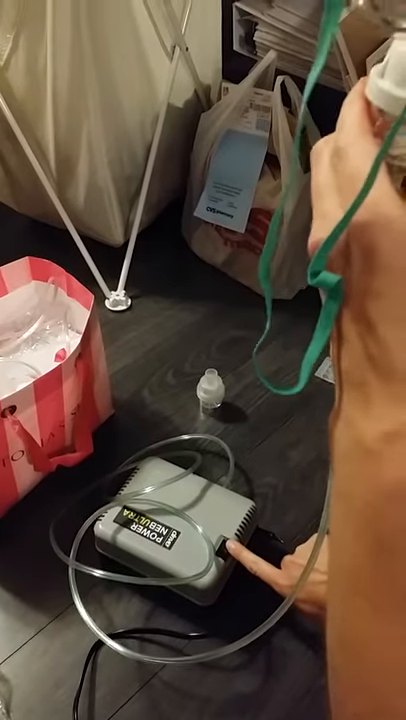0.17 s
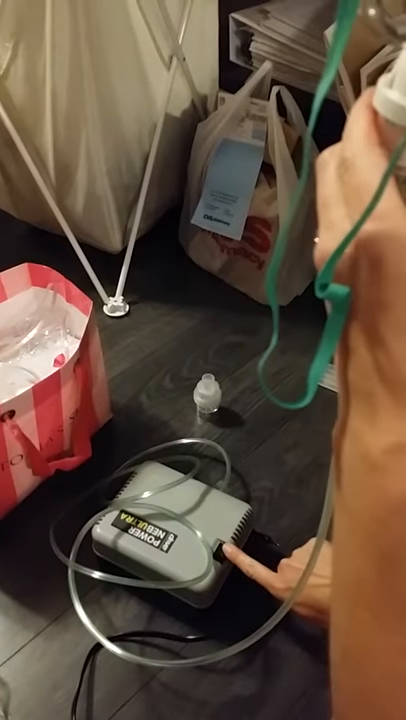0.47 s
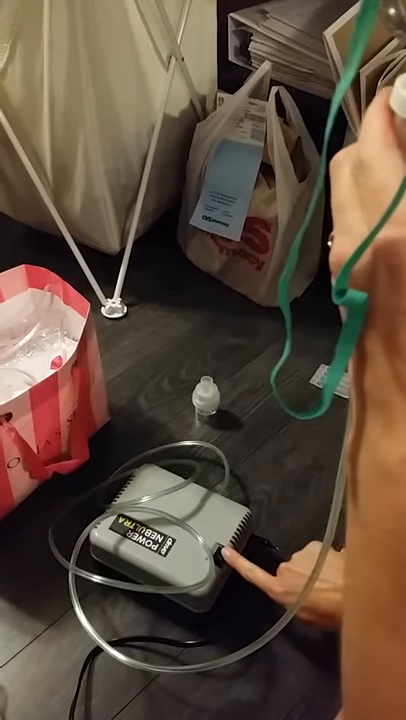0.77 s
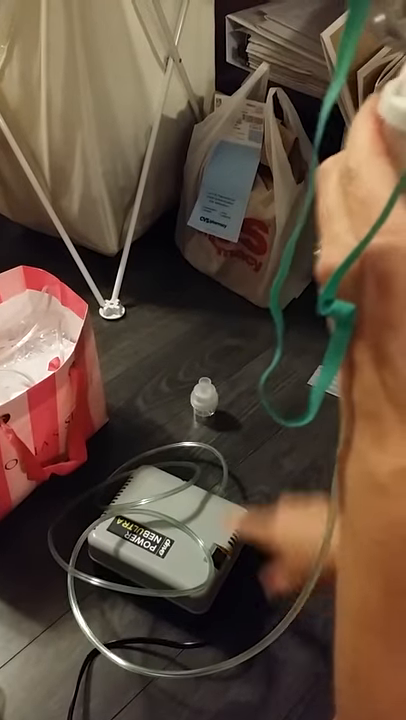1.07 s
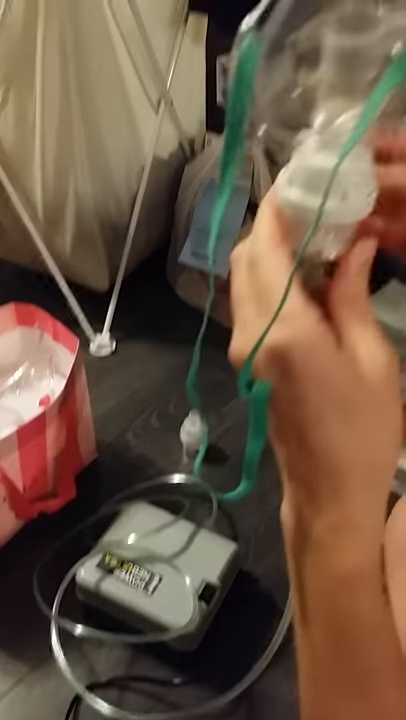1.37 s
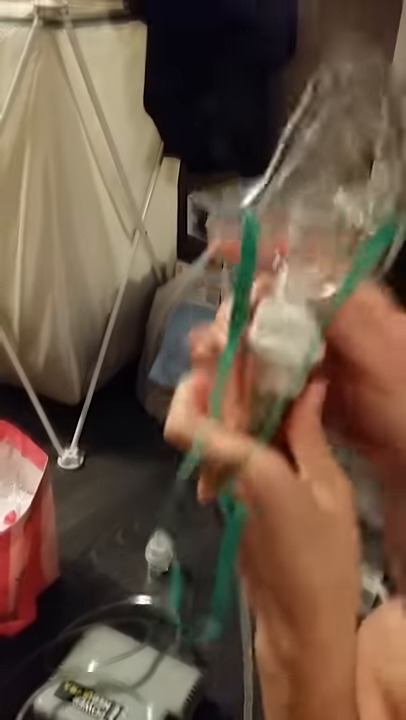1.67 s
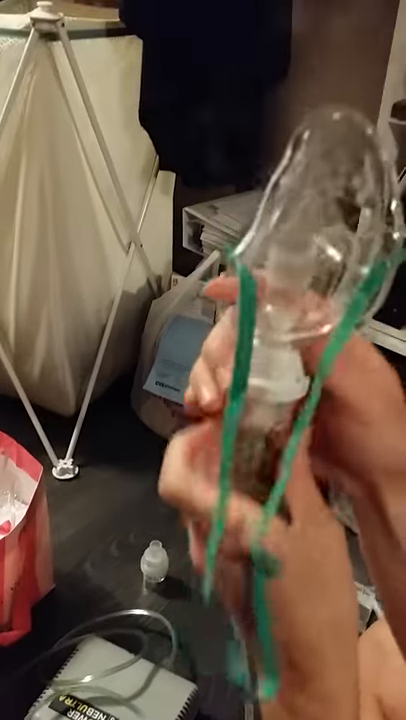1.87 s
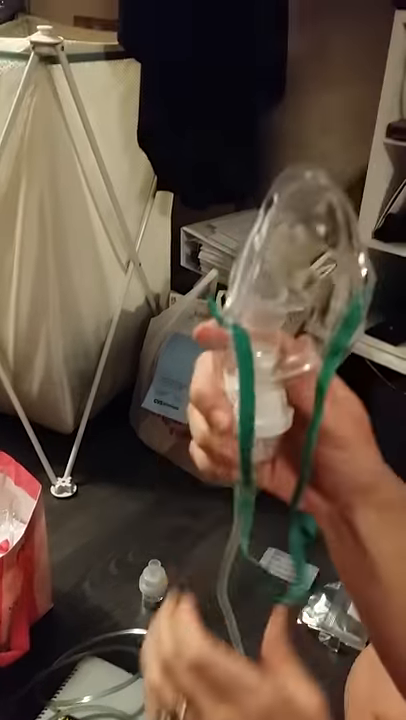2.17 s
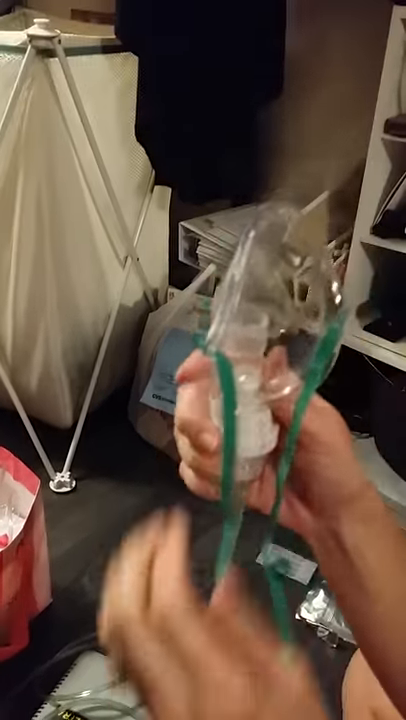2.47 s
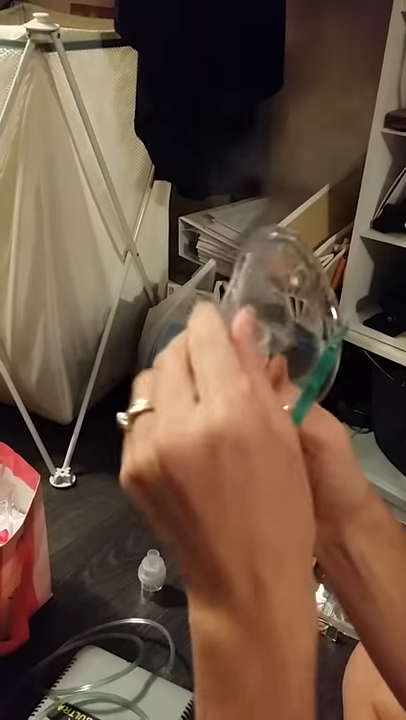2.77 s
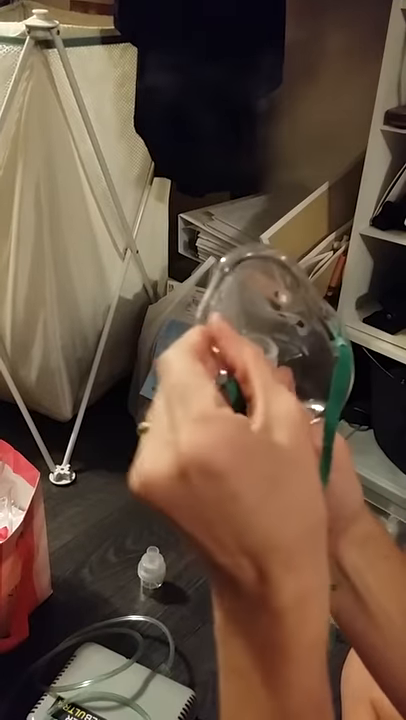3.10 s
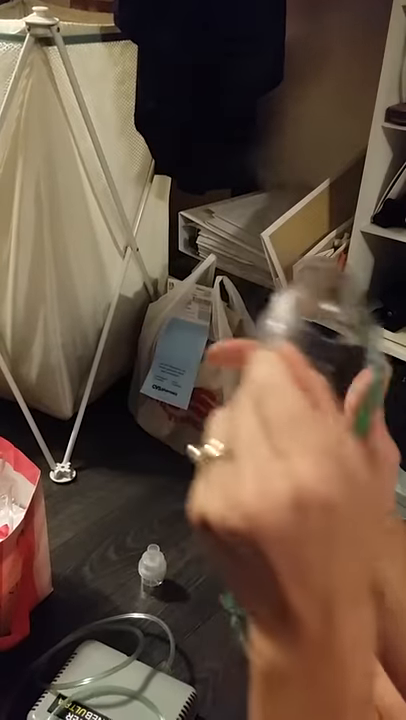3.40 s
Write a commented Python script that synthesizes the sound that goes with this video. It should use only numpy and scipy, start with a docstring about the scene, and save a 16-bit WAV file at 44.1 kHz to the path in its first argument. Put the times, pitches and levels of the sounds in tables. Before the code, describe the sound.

A nebulizer clicks on and runs with a motor buzz and growing airy hiss.

```python
"""A nebulizer starting up

On the floor of a small room a switch snaps and a piston compressor spins up to a steady buzz, whose tone
changes as the finger leaves the case. Air builds up in the hose and the jet hisses and sputters through
the resonances of the cup and mask, which a hand lifts and turns close to the microphone."""
import sys
import numpy as np
from scipy import signal
from scipy.fft import rfft, irfft, next_fast_len
from scipy.io import wavfile
from scipy.ndimage import uniform_filter1d, map_coordinates

SR = 44100
rng = np.random.default_rng(int(sys.argv[2]) if len(sys.argv) > 2 else 0)


def unload_audio(sound):
    """Save the sound as a 16-bit wav file, at the path given as the first command line argument."""
    columns = np.transpose(np.atleast_2d(sound))
    # keep every value between -1 and 1, then stretch to whole-number steps
    steps = np.round(np.clip(columns, -1, 1) * 32767)
    wavfile.write(sys.argv[1], SR, steps.astype(np.int16))


N = 156114
TIME_S = np.arange(N) / SR


def amp(db):
    """Amplitude ratio of a level in decibels."""
    return 10 ** (np.asarray(db) / 20)


def along(points, hz):
    """Interpolation on a logarithmic frequency axis."""
    knots_hz, values = np.transpose(points)
    return np.interp(np.log(hz + 1), np.log(knots_hz + 1), values)


def colour(points):
    """Spectral envelope: gain as a function of frequency."""
    return lambda hz: amp(along(points, hz))


def curves(rows):
    """Linear interpolation in time of each column after the first."""
    times, *columns = np.transpose(rows)
    return [np.interp(TIME_S, times, column) for column in columns]


def crossfade(middle_s, length_s):
    """Linear transition from 0 to 1."""
    return np.clip((TIME_S - middle_s) / length_s + .5, 0, 1)


def wobble(knots_per_s):
    """Smooth random modulation."""
    return map_coordinates(rng.standard_normal(N // 16), [TIME_S * knots_per_s], mode="wrap")


def panned(pan_db):
    """Constant-power panning; pan_db is the left level minus the right."""
    gains = amp(np.array([pan_db, -pan_db]) / 2)
    return gains / np.sqrt(np.mean(gains ** 2, axis=0))


# Likeness of left and right: frequency_hz, coherence
COHERENCE = [(50, 0.35), (600, 1), (1200, 0.18), (2200, 0.074), (4600, 0.34), (14000, 0.76)]
def noise(gain, lead_rad=0):
    """Partially coherent stereo noise, slightly patchy, of unit mid rms; the left leads by lead_rad."""
    cells = signal.stft(rng.standard_normal((2, N)), nperseg=512)[2]
    patches = uniform_filter1d(rng.standard_normal(cells.shape[1:]), size=6, axis=0)
    patches = uniform_filter1d(patches, size=14, axis=1)
    patches_db = 2.39 * patches / np.sqrt(np.mean(patches ** 2))
    white = signal.istft(cells * amp(patches_db), nperseg=512)[1][:, :N]
    size = next_fast_len(N)
    hz = np.fft.rfftfreq(size, 1 / SR)
    spread = np.arccos(along(COHERENCE, hz)) / 2
    mid, side = rfft(white, size) * gain(hz) * np.array([np.cos(spread), np.sin(spread)])
    phase_shift = np.exp(.5j * lead_rad * np.array([[1], [-1]]))
    pair = irfft(np.array([mid + side, mid - side]) * phase_shift, size)[:, :N]
    return pair / pair.mean(0).std()


def resonance(strength, centres, half_width_hz, lead_rad=0):
    """Noise-driven resonance: a Lorentzian band whose level, pan and centre move."""
    level_db, pan_db = curves(strength)
    centre_hz, = curves(centres)
    mean_hz = centre_hz.mean()
    band = noise(lambda hz: 1 / (1 + ((hz - mean_hz) / half_width_hz) ** 2), lead_rad)
    analytic = signal.hilbert(band, next_fast_len(N))[:, :N]
    drift = np.exp(2j * np.pi * np.cumsum(centre_hz - mean_hz) / SR)
    return amp(level_db) * panned(pan_db) * np.real(analytic * drift)


# Spectrum of the quiet room: frequency_hz, density_db
ROOM_SPECTRUM = [(30, -2), (200, 16), (1000, -17), (14000, -48)]
def room_tone():
    """Ambient noise: a steady floor with most of its power at low frequencies."""
    return amp(-62) * noise(colour(ROOM_SPECTRUM))


# Bumps of the hands on hose and cup: peak_s, level_db
BUMPS = [(1.79, -57), (1.87, -58), (2.05, -65), (2.33, -62), (2.48, -59.5), (3.51, -58)]
# Their spectrum: frequency_hz, density_db
BUMP_SPECTRUM = [(20, -8), (45, -1), (90, 9), (200, -26), (800, -60)]
def handling(half_width_s=0.028):
    """Soft impacts: the slow contact of a shifting grip excites mainly low frequencies."""
    envelope = sum(amp(db) * np.exp(-((TIME_S - peak_s) / half_width_s) ** 2) for peak_s, db in BUMPS)
    return envelope * noise(colour(BUMP_SPECTRUM))


# Snap of the rocker switch: frequency_hz, density_db
SWITCH_SPECTRUM = [(60, -50), (260, 7), (420, -30), (650, 3.5), (1400, -14), (2200, 0), (5000, -4),
                   (7300, 2), (8500, 10), (10500, -4), (14500, -12)]
def switch(t60_s=0.21):
    """Reverberant decay: the snap dies away exponentially in the room."""
    envelope = amp(-33 - 60 * TIME_S / t60_s)
    return envelope * noise(colour(SWITCH_SPECTRUM), lead_rad=1.0) * panned(-2.0)[:, None]


# Strength of the case's groan: time_s, level_db, pan_db
GROAN = [(.03, -73, 3), (.08, -57, 4), (.13, -41.5, 0), (.17, -58, 2), (.23, -42, 7), (.3, -65, 11),
         (.4, -90, 0)]
# Its pitch: time_s, centre_hz
GROAN_CENTRE = [(.08, 590), (0.158, 622), (0.209, 519.5)]
def case_groan():
    """Structural resonance: the case groans under the starting torque."""
    return resonance(GROAN, GROAN_CENTRE, half_width_hz=18)


# Shaft speed as the motor spins up: time_s, speed_hz
SHAFT_SPEED = [(0, 14), (.08, 30), (.15, 43), (.2, 51), (.26, 54), (.32, 54.27), (1, 54.2), (1.28, 54.27),
               (3.54, 54.28)]
def shaft():
    """Rotation: speed in Hz and its integral, the angle in radians; one turn is one piston stroke."""
    speed_hz, = curves(SHAFT_SPEED)
    return speed_hz, 2 * np.pi * np.cumsum(speed_hz) / SR


# Response of the case under the finger: multiple_of_running_speed, gain_db
CASE_PRESSED = [(1, -7), (2, -4), (3, -21), (4, 4), (5, -1), (6, -7), (7, -14), (8, -30), (9, -0.5),
                (10, -5.5), (11, 1.5), (12, 1), (13, 6.5), (14, -2.5), (15, -34), (16, -7), (17, -11),
                (18, -1.5), (19, 1.5), (20, -2.5), (21, -7), (22, -7), (23, -7.5), (24, -19), (25, -16),
                (26, -25), (27, -11), (28, -9.5), (29, -34), (30, -11.5), (35, -14.5), (36, -33)]
# Response of the free case: multiple_of_running_speed, gain_db
CASE_FREE = [(1, -45), (2, -16.5), (3, -19.5), (4, -7.5), (5, -11.5), (6, -14.5), (7, -17.5), (8, -26.5),
             (9, -12.5), (10, -10.5), (11, -1.5), (12, 3.5), (13, -9.5), (14, -7.5), (15, -20.5),
             (16, -8.5), (17, -14.5), (18, -9.5), (19, -12), (20, -8.5), (21, -14), (22, -13.5),
             (23, -14.5), (24, -21.5), (25, -21.5), (26, -23), (27, -18.5), (28, -13.5), (29, -23),
             (30, -36), (31, -21.5), (32, -31), (33, -14.5), (34, -22.5), (35, -21.5), (36, -17.5),
             (37, -40), (38, -24.5), (39, -25.5), (40, -26.5), (41, -24), (42, -25.5), (43, -38), (45, -38),
             (46, -27), (47, -22.5), (48, -40), (49, -19), (50, -18.5), (51, -20), (52, -28)]
def case_buzz(speed_hz, angle, released, running_hz=54.27, chug_order=11.5):
    """Forced vibration: shaft harmonics sweep up through the case's resonances, held near unit rms."""
    buzz = np.zeros((2, N))
    for order, (smear, skew) in enumerate(rng.standard_normal((len(CASE_FREE), 2)), 1):
        multiple = order * speed_hz / running_hz
        pressed_db = np.interp(multiple, *np.transpose(CASE_PRESSED), right=-26)
        free_db = np.interp(multiple, *np.transpose(CASE_FREE))
        gain = amp(pressed_db + released * (free_db - pressed_db))
        # Orders near the main resonance stay in step and chug; the room smears the others' phases.
        distance = abs(order - chug_order)
        smear_rad = .3 * smear * max(distance - 2, 0)
        dispersion_rad = .13 * distance ** 2
        stereo_rad = np.array([[.5], [-.5]]) * min(0.11 * order, 1.5) * (.5 * skew - 1)
        buzz += gain * np.cos(order * angle + smear_rad - dispersion_rad + stereo_rad)
    power = uniform_filter1d(np.mean(buzz ** 2, axis=0), size=SR // 9)
    return buzz / np.sqrt(np.abs(power) + 1e-9)


# Loudness of the compressor: time_s, relative_level_db
COMPRESSOR_LEVEL = [(.03, -60), (.12, -50.5), (.23, -41), (.45, -44), (.75, -44.5), (.95, -39.5),
                    (1.3, -35), (1.55, -34.5), (1.85, -32), (2.1, -34), (3, -32.5), (3.3, -31),
                    (3.54, -28.5)]
# Air churning in the pump: frequency_hz, density_db
CHURN_SPECTRUM = [(25, -53), (55, -32), (90, -11), (180, -10), (300, -8.5), (410, -16), (520, -7),
                  (650, 0.5), (800, -6), (1100, -8), (1500, -13.5), (2000, -15), (3200, -21), (8000, -39)]
def compressor(speed_hz, angle):
    """Periodic excitation: every piston stroke thumps the case and churns the air in the pump."""
    level_db, = curves(COMPRESSOR_LEVEL)
    released = crossfade(middle_s=1.25, length_s=0.35)
    churn_db = -8 - 2.5 * released  # stronger until the finger leaves the case
    churn = amp(churn_db) * noise(colour(CHURN_SPECTRUM)) * (1 + 0.55 * np.cos(angle))
    scatter_db = .45 * wobble(50)
    buzz = amp(0.57) * case_buzz(speed_hz, angle, released)
    return amp(level_db + scatter_db) * (buzz + churn)


# The jet's hiss in three bands: time_s, relative_level_db, pan_db
HISS_LOW = [(0.06, -64, -2.0), (0.11, -71, -19), (0.29, -51.5, 1), (0.67, -53.5, 2.5), (1.27, -41.5, -0.5),
            (2.07, -45.5, -1.5), (2.92, -44.5, -9), (3.51, -41, -1)]
HISS_MID = [(0.06, -65.5, 4.5), (0.29, -49, 11), (.7, -50, 9.9), (1.13, -44.5, 10), (1.23, -39, 15),
            (1.49, -45, 8.8), (2.1, -42.5, 2.6), (3.46, -44, 5.8)]
HISS_TOP = [(0.06, -69, -3), (0.08, -58, 5.0), (0.19, -44, 5), (0.5, -38, 6.5), (0.82, -36.5, 6.5),
            (1.12, -31, 6.5), (1.29, -30, 8), (1.34, -30.5, 4), (1.54, -32.5, 6), (1.77, -30.5, 4),
            (1.86, -35, 1), (2.09, -34.5, 2), (2.3, -34.5, 2.5), (2.6, -32.5, 1), (3.02, -31.5, 5.5),
            (3.52, -29, -3.5)]
# Spectra of those bands: frequency_hz, density_db
LOW_SPECTRUM = [(200, -16.5), (900, -0.5), (1300, 1), (1800, -3), (2300, 8), (2850, 5), (3100, -13),
                (3400, -38), (3800, 5.5), (4500, -57)]
MID_SPECTRUM = [(3000, -100), (3600, -10.5), (4200, -6), (4620, 2), (5000, 0.5), (5550, 2.5), (5850, -7.5),
                (6200, -60), (7000, -52)]
TOP_SPECTRUM = [(5800, -91), (6500, -22), (7100, -2), (7700, -7.5), (8400, 1.5), (9000, -1), (10300, -2.5),
                (11200, -5), (12100, 4.5), (13200, 3), (14400, 4), (16000, -5)]
JET_LEAD_RAD = 1.78
def jet_hiss():
    """Turbulence: broadband noise from the jet grows as air builds up in the hose."""
    hiss = np.zeros((2, N))
    for strength, spectrum, gain_db, lead_rad in ((HISS_LOW, LOW_SPECTRUM, -3, 0),
                                                  (HISS_MID, MID_SPECTRUM, 1, -JET_LEAD_RAD),
                                                  (HISS_TOP, TOP_SPECTRUM, 1, JET_LEAD_RAD)):
        level_db, pan_db = curves(strength)
        hiss += amp(level_db + gain_db) * panned(pan_db) * noise(colour(spectrum), lead_rad)
    return hiss


# Strength of the vent's resonance: time_s, level_db, pan_db
VENT = [(.7, -56, 7), (1.05, -35, 18), (1.3, -31, 9), (1.6, -34, 19), (1.85, -44, 8), (2.1, -70, 0)]
# Its pitch: time_s, centre_hz
VENT_CENTRE = [(1, 12200), (1.302, 12480), (1.5, 12740), (1.7, 14100)]
def vent():
    """Flow-excited resonance: a broad, high band swells, rises in pitch and fades."""
    return resonance(VENT, VENT_CENTRE, half_width_hz=490, lead_rad=JET_LEAD_RAD)


# Strength of the mask's main resonance: time_s, relative_level_db, pan_db
MASK = [(0.06, -69, 5.5), (0.3, -54.5, 7), (0.93, -44.5, 14), (1.16, -41, 15), (1.64, -37.5, 3),
        (1.76, -30.5, 2.5), (2.67, -49.5, 1), (2.88, -46.5, -2), (3.54, -40, 4)]
# Its pitch: time_s, centre_hz
MASK_CENTRE = [(0.199, 4640), (1.7, 4620), (3.5, 4555)]
# Lesser resonances: centre_hz, half_width_hz, rows of (time_s, level_db, pan_db)
MASK_MODES = [ (3227, 107, [(.9, -99, 10), (1.2, -55, 11), (1.8, -56, 15), (2.9, -60, 18), (3.2, -86, 12)]),
              (5567, 99, [(.3, -64, 16), (1.1, -48, 13), (1.32, -49, 12), (1.5, -59, 9), (2.74, -58, 10),
              (2.83, -35, 9), (2.93, -55, 18), (3.54, -40.5, 20)]), (10140, 386, [(.4, -59, -5),
              (1.2, -40, -6), (1.5, -38.5, -17), (1.72, -33.5, -14), (1.9, -41.5, -27), (2.35, -41, -22),
              (2.9, -34, -13), (3.54, -49, -7)])]
def mask():
    """Cavity modes: as the mask is turned, the main one drifts and the lesser ones come and go."""
    main = amp(-4) * resonance(MASK, MASK_CENTRE, half_width_hz=127, lead_rad=-JET_LEAD_RAD)
    lesser = sum(resonance(strength, [(0, hz)], half_width) for hz, half_width, strength in MASK_MODES)
    return main + lesser


# Strength of the cup's strongest resonance: time_s, relative_level_db, pan_db
CUP = [(0.06, -56, -12), (0.15, -47, -7), (0.35, -42, -6), (0.44, -35, -4), (0.76, -37.5, -9),
       (0.87, -31.5, -5), (1.3, -31, -7), (1.64, -35, -14), (1.77, -23, -19), (2.23, -27, -16),
       (2.36, -34, -15), (2.64, -32.5, -27), (2.7, -27, -20.5), (2.82, -26.5, -26), (2.93, -30.5, -14),
       (3.06, -26, -6), (3.29, -24.5, -6), (3.39, -28, -7.0), (3.53, -23.5, -10.5)]
# Its pitch: time_s, centre_hz
CUP_CENTRE = [(.2, 8806), (.6, 8775), (1, 8745), (1.33, 8715), (1.5, 8620), (1.9, 8647), (2.3, 8695),
              (3, 8590), (3.54, 8576)]
def cup():
    """Cavity resonance: the cup's ring drifts as it is tilted and broadens as it comes close."""
    near = crossfade(middle_s=1.45, length_s=0.99)
    narrow = resonance(CUP, CUP_CENTRE, half_width_hz=93, lead_rad=0.68)
    broad = resonance(CUP, CUP_CENTRE, half_width_hz=204, lead_rad=0.68)
    return amp(-3) * (np.sqrt(1 - near) * narrow + np.sqrt(near) * broad)


def jet(angle, sputter_limit=1.6):
    """Atomization: the jet tears liquid into mist, sputtering at random and fluttering with each stroke."""
    sputter = sputter_limit * np.tanh(wobble(89) / sputter_limit)
    flutter_db = -.6 * np.cos(angle)
    hiss = amp(flutter_db - 0.3 * sputter) * (vent() + jet_hiss())
    ringing = amp(flutter_db + 1.4 * sputter) * (cup() + mask())
    return hiss + ringing


def scene():
    """Superposition: room tone, hands, switch, and the compressor and jet that share one shaft's rhythm."""
    speed_hz, angle = shaft()
    return room_tone() + handling() + switch() + compressor(speed_hz, angle) + jet(angle)


def record(dry, cutoff_hz=14580):
    """Band limiting: an ideal low-pass filter removes everything above the cutoff."""
    size = next_fast_len(N + SR // 2)
    passband = np.fft.rfftfreq(size, 1 / SR) < cutoff_hz
    return irfft(rfft(dry, size) * passband, size)[..., :N]


dry = scene()
out = record(dry)
unload_audio(out)
```